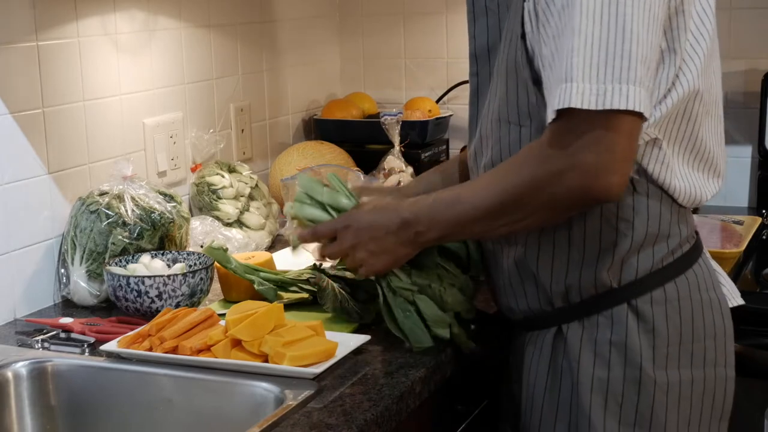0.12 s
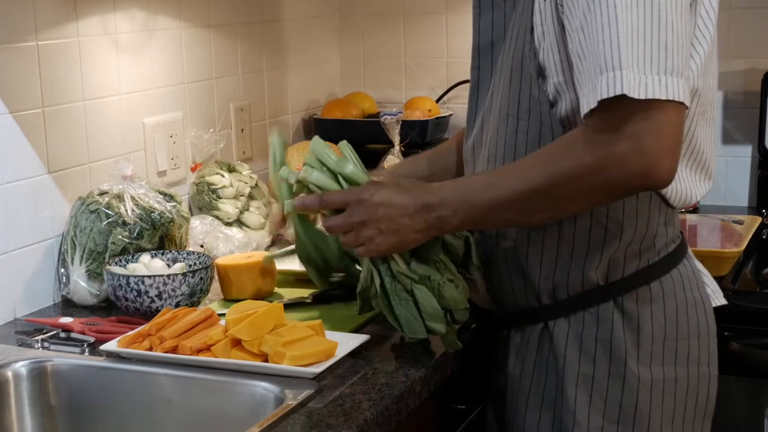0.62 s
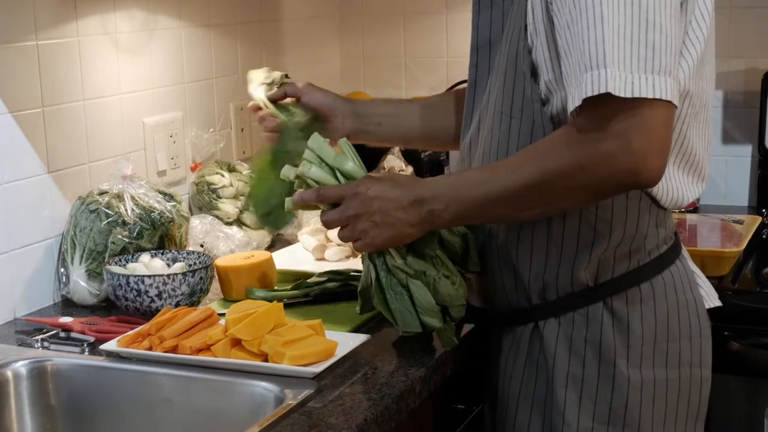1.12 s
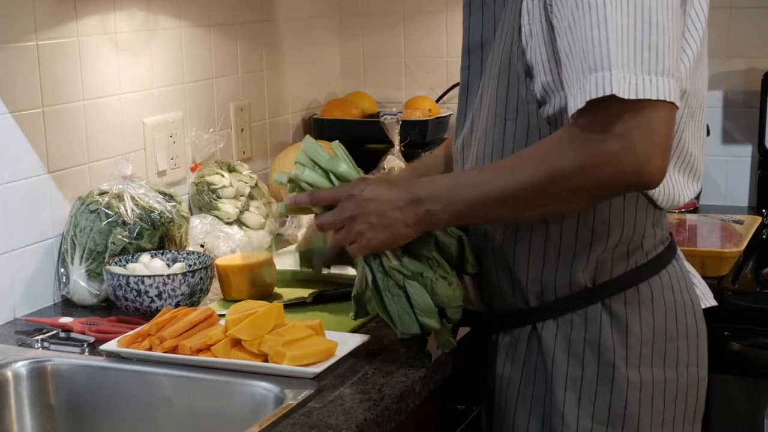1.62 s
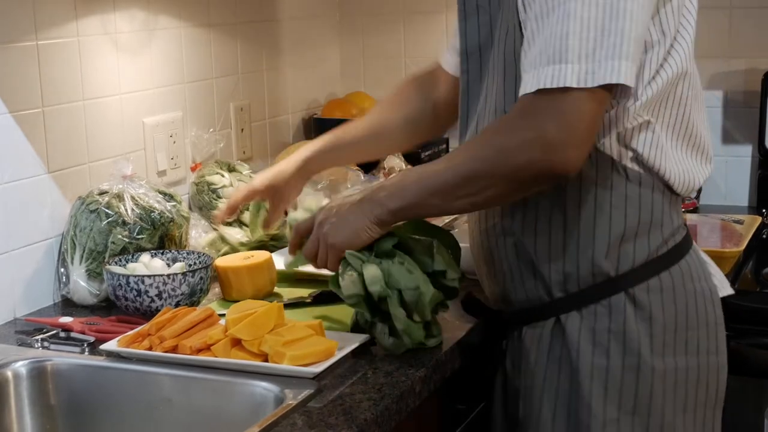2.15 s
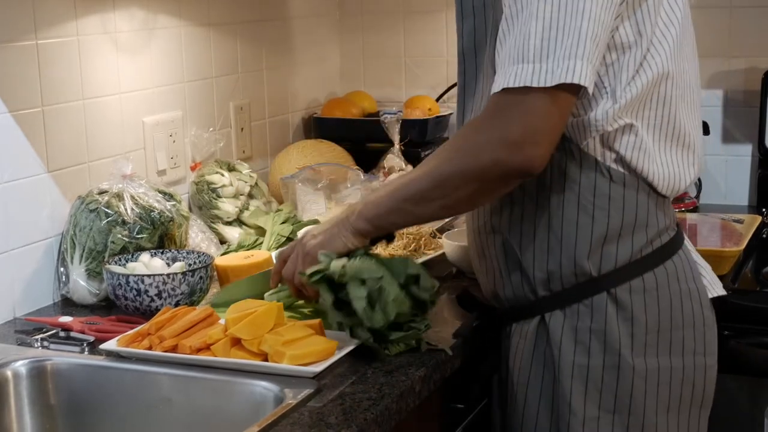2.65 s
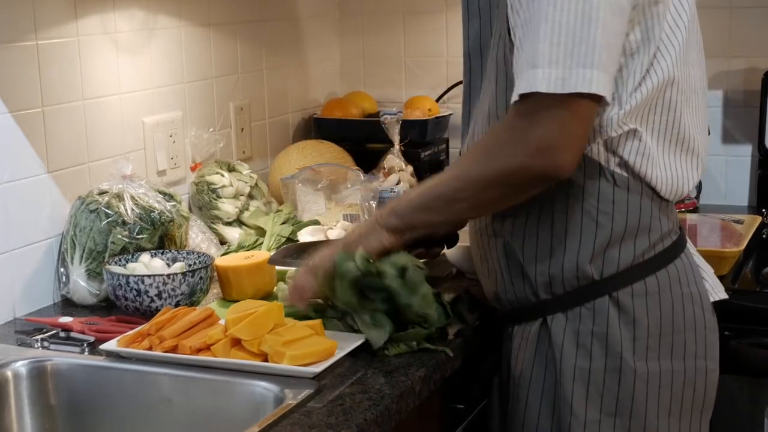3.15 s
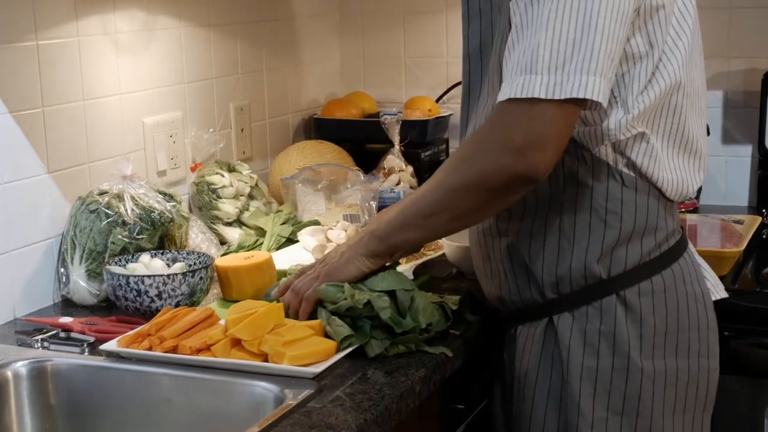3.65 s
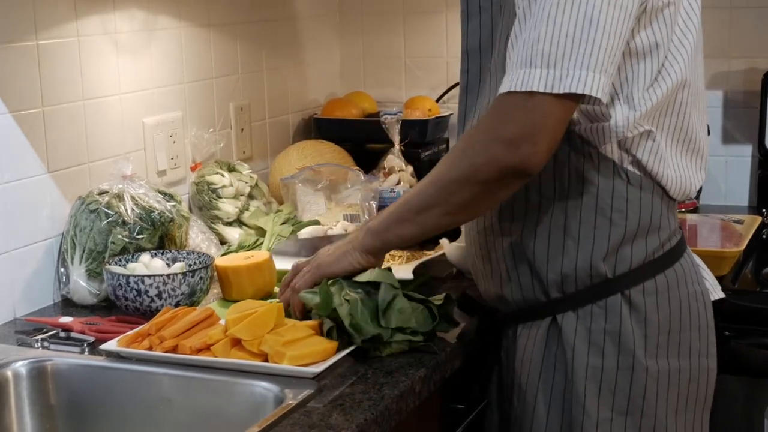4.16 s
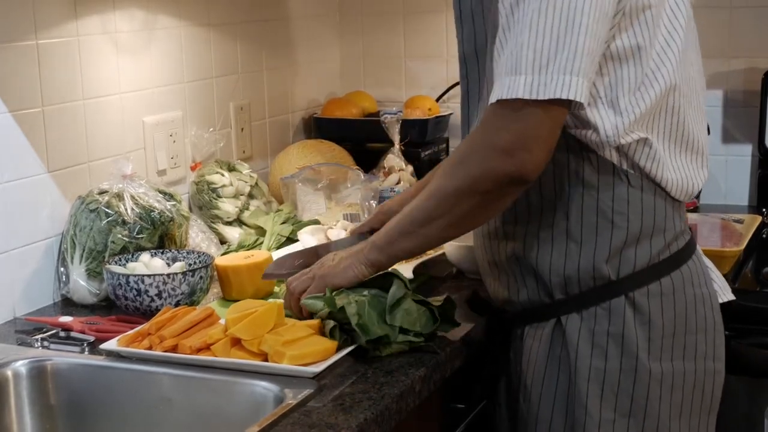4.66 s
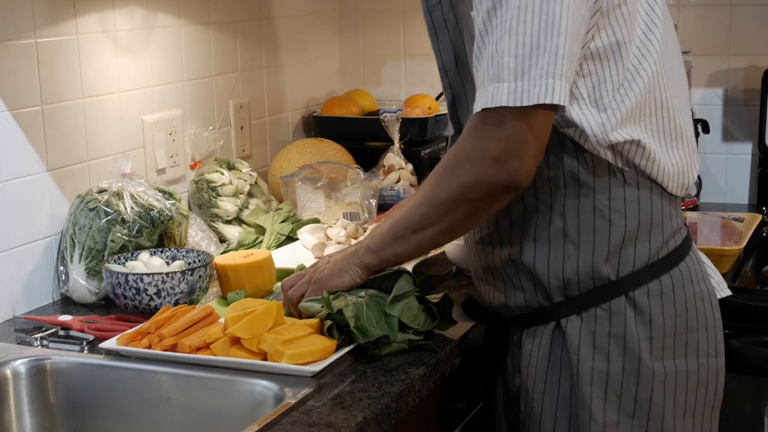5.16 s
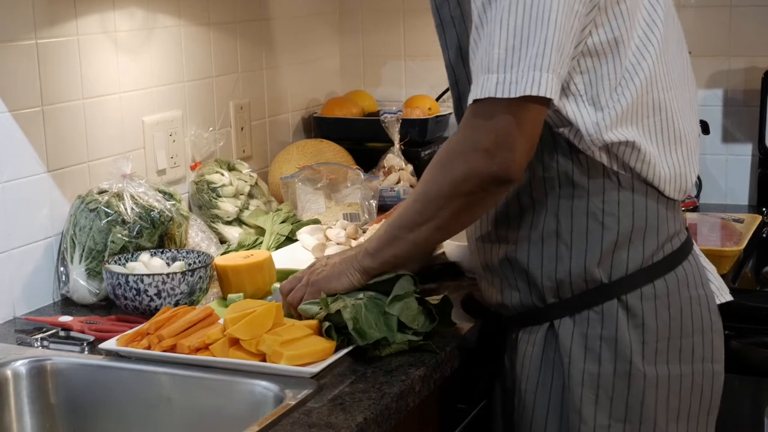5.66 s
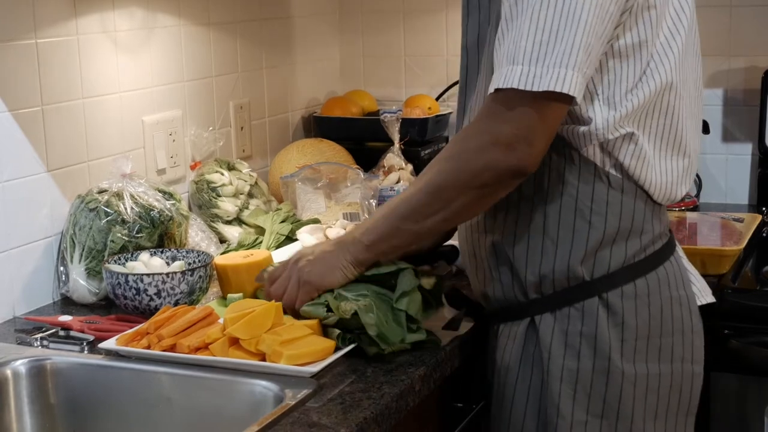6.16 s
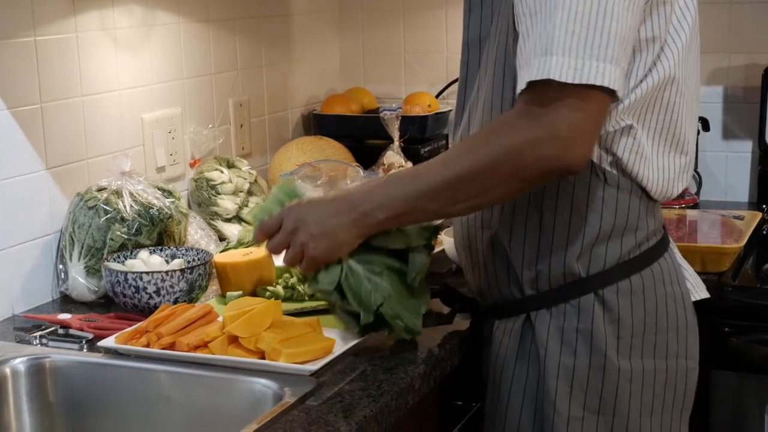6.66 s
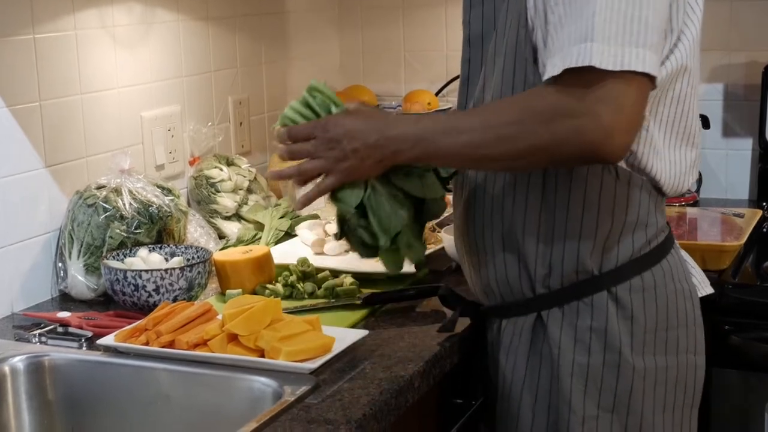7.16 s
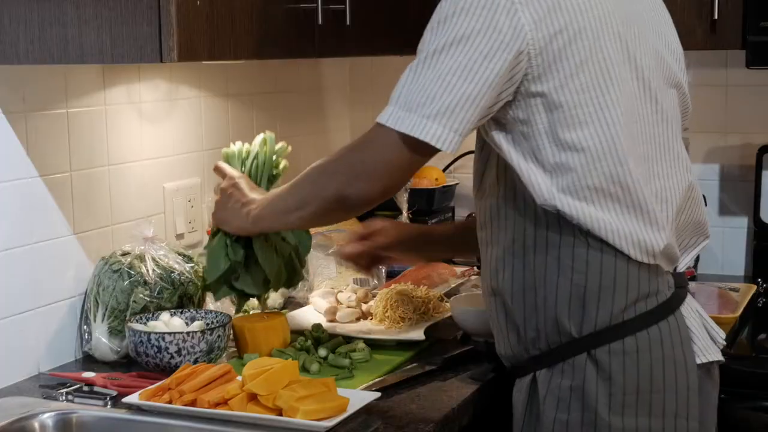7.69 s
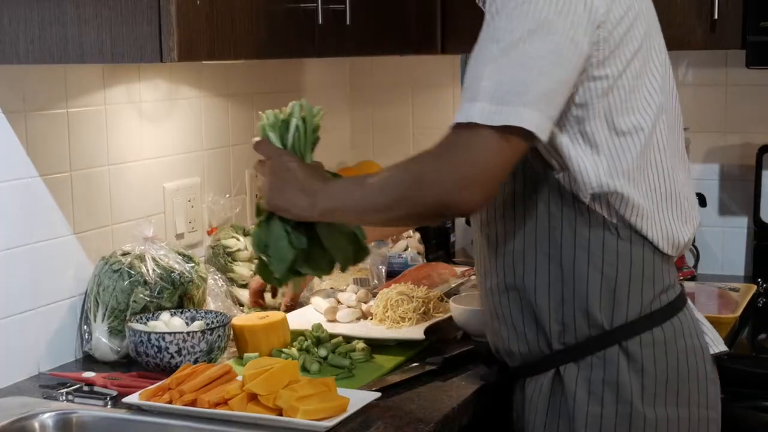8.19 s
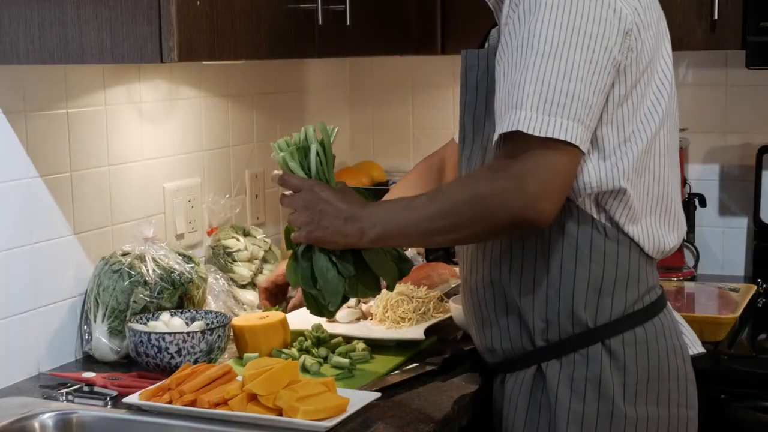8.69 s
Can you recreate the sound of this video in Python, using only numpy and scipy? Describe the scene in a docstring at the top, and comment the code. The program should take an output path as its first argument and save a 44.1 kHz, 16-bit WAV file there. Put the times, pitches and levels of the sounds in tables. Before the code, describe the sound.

Leafy greens rustle and snap in a cook's hands, then hard knife chops knock a cutting board in a softly humming tiled kitchen.

```python
"""Leafy greens rustle and snap as a cook sorts them: grainy, patchy noise and short resonant noise bursts.
Blows and dragged loads excite the bending modes of a cutting board; the knife blade sings as it slides.
Dishes ring as decaying sines, soft loads flex the counter, and an appliance drones over air noise and rumble.
Decaying noise tails give the tiled room's answer; one microphone hears it, almost alike on both channels."""
import sys
import numpy as np
from scipy import signal
from scipy.fft import rfft, irfft, next_fast_len
from scipy.io import wavfile
from scipy.ndimage import uniform_filter1d, map_coordinates

SR = 44100
rng = np.random.default_rng(int(sys.argv[2]) if len(sys.argv) > 2 else 0)


def master_out(mix):
    """Clip the mix to full scale and print it as 16-bit PCM to the path in sys.argv[1]."""
    frames = np.transpose(np.atleast_2d(mix))
    ceiling = np.clip(frames, -1, 1)
    pcm = np.round(ceiling * 32767).astype(np.int16)
    wavfile.write(sys.argv[1], SR, pcm)


def gain_from_db(level_db):
    """Convert decibel levels to linear amplitude factors (20 dB per decade)."""
    decades = np.asarray(level_db, float) / 20
    return 10 ** decades


N = 388521  # samples in the scene

# Room tone spectrum: f/Hz, relative density/dB per Hz
ROOM_TONE_SPECTRUM = [(41, -76), (70, -16), (118, -15), (142, -11), (228, -2.5), (321, -6), (403, -6),
                      (483, -12), (566, -15), (695, -16), (892, -16.5), (1280, -20), (1760, -30),
                      (3110, -37), (16000, -55)]
ROOM_TONE_DB = -55
# Appliance drone: f/Hz, width of each of two cascaded resonances/Hz, level/dB
APPLIANCE_DRONE = [(157.2, 19.8, -60)]
# Rumble swells: peak t/s, level/dB, rise over 20 dB/s, fall over 20 dB/s
RUMBLE_SWELLS = [(.6, -62, .9, .9), (3.24, -61, .9, 0.37), (4.86, -54, .3, .4), (5.7, -66, .5, .9)]
# Rumble spectrum: f/Hz, relative level/dB
RUMBLE_SPECTRUM = [(8, -46), (24, 11.5), (45, 8.5), (65, -16), (85, -34), (200, -86)]
RUMBLE_FLOOR_DB = -64.5
# Decay of the room's answer: f/Hz, t60/s
ROOM_DECAY = [(200, 0.66), (1000, 0.38), (4000, 0.43), (12000, 0.28)]

# Weight landing on the counter: t/s, level/dB
THUD_BLOWS = [(0.907, -47), (1.463, -43), (2.183, -51), (2.359, -44), (3.46, -57), (4.751, -48),
              (4.799, -38), (4.842, -38.5), (5.239, -50), (5.5, -46.5), (6.357, -50), (6.534, -48),
              (7.377, -54)]
# Counter modes: nominal f/Hz, level/dB, t60/s
COUNTER_MODES = [(58, -3, 0.41), (98, -4.5, 0.18), (160, 0, 0.11)]

# Plate modes: f/Hz, level/dB, t60/s
PLATE_MODES = [(1105, -4, 0.28), (1588, 1.5, 0.14), (1710, 4.5, .09), (2390, -1, 0.033), (2800, -6, 0.055),
               (3003, -8, 0.18), (3600, -10.5, 0.11), (3870, -12, .06), (4400, -28, .1), (5140, -17, 0.18),
               (5975, -21, .14), (6300, -21, .16), (7138, -37, 0.092), (9114, -19, 0.094),
               (10710, -26, .13), (11190, -25, .12)]
# Blows on the plate: t/s, level/dB
PLATE_HITS = [(3.471, -32), (3.592, -51)]
# Bowl modes: f/Hz, level/dB, t60/s
BOWL_MODES = [(1890, -7, .08), (2266, -2.5, 0.26), (2590, -14, .22), (3050, -18, .19), (3250, -5.5, 0.13),
              (3914, -2, .09), (5020, -11, 0.085), (5706, -2.5, 0.047), (7330, -11, 0.066), (7300, -6, .12),
              (8312, -8.5, 0.05), (8920, -4, .08), (9600, -13, .08), (10930, -13, .08),
              (11300, -19.5, 0.071)]
# Blows on the bowl: t/s, level/dB
BOWL_HITS = [(2.421, -42.5), (2.428, -41.5), (8.766, -54.5)]
# Steel utensil modes: f/Hz, level/dB, t60/s
UTENSIL_MODES = [(3790, 0, .2), (4660, -3, .25), (4990, -5, .22), (5400, -11, .2), (5986, -5, .25),
                 (7047, -11, .12), (8200, -8, .1)]
# Blows on the utensil: t/s, level/dB
UTENSIL_HITS = [(0.909, -54), (.925, -57), (0.959, -62), (1.005, -61), (1.037, -71)]
DULLER = 0.45  # dB per octave lost for each dB below the hardest blow

# Knife blade resonances: f/Hz, width/Hz, relative level/dB
BLADE_MODES = [(2560, 90, 7.5), (3000, 27, 5), (3240, 130, 1.5), (3780, 160, 0), (4660, 74, 2),
               (5460, 160, 6.5), (8640, 290, -3)]
# Blade sliding: peak t/s, level/dB, rise over 20 dB/s, fall over 20 dB/s
BLADE_SLIDES = [(5.9, -39.5, 0.1, 0.062), (6.53, -71, .02, .07)]

# Board bending modes: f/Hz, width/Hz, relative level/dB
BOARD_MODES = [(338, 10, 0), (480, 85, 2), (559, 30, -4.5), (630.6, 35, 1.5), (785, 37, -1.5),
               (920, 54, -1), (1114, 130, -4), (1186, 76, 0.5), (1298, 68, -0.5), (1389, 41, -1.5),
               (1548, 65, 4), (1734, 59, -0.5), (1905, 103, 3), (2320, 110, 9.5)]
# Things dragged over the board: peak t/s, level/dB, rise over 20 dB/s, fall over 20 dB/s, centre f/Hz
BOARD_DRAGS = [(.93, -49.5, 0.088, 0.18, 850), (2.17, -59.5, 0.18, 0.48, 770),
               (2.43, -37, 0.086, 0.065, 714), (2.61, -41.5, 0.074, 0.1, 900), (3.45, -68, 0.21, 0.59, 900),
               (3.898, -64.5, 0.27, 0.68, 1110), (4.69, -55, 0.067, 0.035, 1130),
               (4.92, -34, 0.05, 0.19, 800), (5.0, -49.5, 0.074, 0.29, 1060),
               (5.28, -43, 0.096, 0.049, 1050), (5.48, -53.5, 0.37, 0.35, 915),
               (5.72, -56, 0.061, .13, 937), (5.827, -35.5, 0.032, 0.2, 986),
               (5.899, -35, 0.12, 0.095, 816), (6.04, -62, .1, .3, 920), (6.54, -32.5, 0.076, 0.12, 970),
               (6.66, -52, .2, 0.26, 860)]
RESTING_DB, RESTING_HZ = -80, 990  # the board under idle hands
# Blows on the board: t/s, peak level of the wood/dB, crack level relative to it before colouring/dB,
# centre f/Hz, rattle t60/s
BOARD_BLOWS = [(.891, -39, -22, 870, 0.21), (.909, -27, -6, 850, 0.02), (.959, -34.5, -36, 830, 0.036),
               (1.004, -40, -21, 804, 0.054), (1.035, -39.5, -22, 890, .05), (1.463, -30, -5, 950, 0.035),
               (2.355, -32, -16, 536, 0.059), (2.417, -31, 10.5, 730, 0.047), (2.582, -42, -2, 910, 0.028),
               (2.626, -30.5, -19, 740, 0.13), (2.887, -41.5, -21, 590, 0.12),
               (3.125, -44, -16, 766, 0.023), (3.471, -27.5, -4, 1090, 0.044), (3.835, -41, 7, 1470, 0.014),
               (3.893, -41.5, 7, 1200, .025), (4.563, -42.5, 6.5, 1350, 0.035),
               (4.657, -40.5, -20, 557, 0.085), (4.866, -33, 12.5, 785, 0.24),
               (4.927, -10.5, -1, 1290, 0.014), (5.232, -18, -8, 1240, 0.014),
               (6.357, -9.5, 1.5, 1140, 0.079), (6.511, -17, -4, 920, .05), (6.548, -19.5, -26, 840, 0.056),
               (8.765, -40.5, -1, 753, .04)]
# Crack gain: f/Hz, gain/dB
CRACK_GAIN = [(1500, -38), (2200, -7.5), (3000, -6), (5500, -16), (8000, -22), (13000, -40), (16000, -55)]
NARROW_DB = 13  # mode fall-off at a crack level of 0 dB, dB per octave squared
NARROW_PER_CRACK = 0.76  # softer contact picks fewer modes: added fall-off per dB of weaker crack
BOARD_LOWEST_HZ = 425
# The worktop under the board answers each blow: f in Hz, level relative to the blow in dB, t60 in s
THUMP_HZ, THUMP_DB, THUMP_T60 = 312, -18, 0.042

# Leaf hiss spectrum: f/Hz, relative density/dB per Hz
LEAF_SPECTRUM = [(120, -35), (400, 5), (800, 3.5), (1500, 1.5), (2500, -0.5), (4000, -3.5), (8500, -7),
                 (10500, -14.5), (14000, -17), (16000, -35)]
# Leaves pulled, turned or squeezed: peak t/s, level/dB, rise over 20 dB/s, fall over 20 dB/s
LEAF_RUSTLES = [(.012, -53, .02, 0.13), (.41, -64.5, 0.04, 0.1), (.635, -61, 0.011, 0.37),
                (.9, -52.5, 0.093, 0.21), (1.17, -63, 0.042, .06), (1.28, -62, 0.2, .1),
                (1.456, -55, 0.0026, 0.096), (1.558, -54, 0.026, .055), (1.658, -61.5, 0.095, .06),
                (1.722, -64.5, 0.059, 0.34), (2.079, -56.5, 0.0033, 0.13), (2.176, -43.5, 0.083, 0.1),
                (2.32, -54.5, 0.03, 0.18), (2.41, -49.5, 0.017, 0.43), (2.604, -52, 0.13, 0.046),
                (2.838, -55, 0.12, .2), (3.076, -55.5, 0.078, 0.35), (3.186, -63, 0.039, 0.76),
                (3.466, -54.5, 0.011, 0.14), (3.84, -60, 0.17, 0.36), (3.885, -62.5, .01, 1),
                (4.22, -76, 0.028, 0.64), (4.56, -63, .01, 0.13), (4.69, -47, 0.041, 0.024),
                (4.75, -46, 0.036, 0.033), (4.88, -35, 0.14, 0.11), (5.25, -38, 0.088, 0.12),
                (5.53, -53.5, 0.014, 0.16), (5.71, -54.5, 0.077, 0.069), (5.89, -39.5, 0.11, 0.083),
                (6.52, -29.5, 0.0088, 0.078), (6.89, -59, 0.0059, 0.35), (7.05, -62.5, 0.15, 0.11),
                (7.21, -69, 0.024, 0.05), (7.26, -61.5, .02, 0.14), (7.53, -58.5, 0.081, .06),
                (7.58, -60.5, 0.027, 0.069), (8.11, -58.5, 0.082, .22), (8.26, -53, 0.053, 0.059),
                (8.41, -60, 0.22, 0.11), (8.51, -64, 0.067, 0.4), (8.75, -65, .12, 0.035)]
# How busy the hands are and how dry the leaves sound: t/s, median rustle level/dB, treble gain/dB
HAND_ACTIVITY = [(0, -74, -1), (.8, -67, 5), (1.4, -78, 1.5), (2.1, -76, 4.5), (2.7, -61, -1),
                 (3.7, -123, 0.5), (4.45, -81.5, 6), (5.05, -61, 5.5), (5.9, -61.5, -4.5),
                 (6.3, -65.5, -3.5), (6.85, -71.5, -6), (7.2, -64, 4), (7.75, -75.5, -0.5),
                 (8.05, -78.5, 9.5), (8.3, -83, 7.5), (8.81, -86, 12)]
# Stems and leaves snapping: t/s, starting level/dB, centre f/Hz
LEAF_SNAPS = [(.633, -52, 6000), (.818, -54.5, 3280), (.9095, -41.5, 4050), (1.463, -50, 3100),
              (1.56, -49, 7900), (2.078, -68, 3400), (2.3211, -57, 4070), (2.4083, -54, 3190),
              (3.476, -41.5, 3000), (3.886, -46.5, 5100), (4.657, -52, 3000), (4.684, -43, 3050),
              (4.7266, -39.5, 3420), (4.742, -39, 3700), (4.781, -42.5, 4000), (4.811, -34.5, 5450),
              (4.8503, -31.5, 4780), (4.9297, -44, 2740), (5.1696, -62, 2870), (5.1941, -48, 2530),
              (5.23, -35, 3000), (5.8183, -47, 2590), (6.234, -61, 2450), (6.3595, -53, 2650),
              (6.891, -52, 3000), (7.01, -55, 2870), (7.0465, -56, 2580), (7.2586, -56, 5060),
              (7.5707, -52.5, 2280), (8.1693, -55.5, 5060)]
GESTURE_SHAPE = 1.165  # exponent of rise and fall: 1 pointed, 2 bell

# Faint steady hiss, opposite in sign in the two channels: f/Hz, relative density/dB per Hz
HISS_SPECTRUM = [(18, -29.5), (30, 5), (303, -8.5), (437, -5), (1390, -7), (14000, -10), (16000, -8)]
# Faint random-phase spread between the channels: f/Hz, gain before random variation/dB
SPREAD_GAIN = [(200, -38), (2000, -28.5), (12000, -16)]
TOP_HZ = 16100  # band limit


def unit(x):
    """Normalization: x at rms 1."""
    return x / np.sqrt(np.mean(x ** 2) + 1e-20)


def along(points, hz):
    """Interpolation of (f, value) points on a logarithmic frequency axis."""
    f, v = np.transpose(points)
    return np.interp(np.log(hz + 1), np.log(f + 1), v)


def smooth(t, v):
    """Linear interpolation of v to every sample."""
    return np.interp(np.arange(N) / SR, t, v)


def curves(rows):
    """Linear interpolation in time of each column after the first."""
    t, *columns = np.transpose(rows)
    return [smooth(t, column) for column in columns]


def wobble(rate):
    """Smooth random modulation: a spline through random knots, rate a second and at most 600."""
    knots = rng.standard_normal(int(N * 600 / SR) + 4)
    return map_coordinates(knots, [np.arange(N) * min(rate, 600) / SR])


def filtered(x, response):
    """Linear filtering: the spectrum of x times a complex response."""
    m = next_fast_len(len(x) + SR // 2)
    hz = np.fft.rfftfreq(m, 1 / SR)
    return irfft(rfft(x, m) * response(hz), m)[:len(x)]


def coloured(x, spectrum):
    """Spectral shaping by (f, level) points, at rms 1."""
    return unit(filtered(x, lambda hz: gain_from_db(along(spectrum, hz))))


def resonant(x, peaks):
    """Modal superposition: causal band-pass resonances summed with alternating sign."""
    def response(f):
        total = 0
        for k, (centre, width, db) in enumerate(peaks):
            bandpass = 1j * f * width / (centre * centre - f * f + 1j * f * width)
            total = total + (-1) ** k * gain_from_db(db) * bandpass
        return total
    return filtered(x, response)


def grainy(spike_db, rate):
    """Stick-slip friction: noise whose strength jumps from moment to moment, as many tiny slips."""
    return rng.standard_normal(N) * gain_from_db(spike_db * wobble(rate))


def patchy(x, patchy_db):
    """Random modulation in patches of frequency and time, at rms 1."""
    z = signal.stft(x, nperseg=256)[2]
    field = uniform_filter1d(rng.standard_normal(z.shape), size=6, axis=0)
    field = uniform_filter1d(field, size=9, axis=1)
    return unit(signal.istft(z * gain_from_db(patchy_db * unit(field)), nperseg=256)[1][:N])


def bursts(times, db, t60):
    """Impulsive excitation: noise starts at once and decays exponentially in t60."""
    out, t = np.zeros(N + SR), np.arange(SR // 5) / SR
    for s, level, life in zip(times, db, t60):
        decay = gain_from_db(level - 60 * t / max(life, 1 / SR))
        out[round(s * SR):][:len(t)] += decay * rng.standard_normal(len(t))
    return out[:N]


def gestures(rows):
    """Power envelope of each gesture: it swells to its peak and dies away."""
    t = np.arange(0, N, 32) / SR
    power = []
    for s, db, rise, fall, *_ in rows:
        distance = np.where(t < s, (s - t) / abs(rise), (t - s) / abs(fall))
        power.append(gain_from_db(db - 20 * distance ** GESTURE_SHAPE) ** 2)
    return t, np.array(power)


def swells(rows):
    """Energy addition: the joint gain of all gestures."""
    t, power = gestures(rows)
    return smooth(t, np.sqrt(power.sum(axis=0)))


def kitchen():
    """Stationary noise: air and machines, a narrow-band wavering drone, and low rumble that swells."""
    tone = gain_from_db(ROOM_TONE_DB) * patchy(coloured(rng.standard_normal(N), ROOM_TONE_SPECTRUM), patchy_db=1.23)
    hz, width, db = APPLIANCE_DRONE[0]
    narrow_noise = resonant(rng.standard_normal(N), [(hz, width, 0)])
    drone = gain_from_db(db) * unit(resonant(narrow_noise, [(hz, width, 0)]))
    rumble = coloured(rng.standard_normal(N), RUMBLE_SPECTRUM)
    rumble_gain = np.hypot(swells(RUMBLE_SWELLS), gain_from_db(RUMBLE_FLOOR_DB))
    return tone + drone + rumble_gain * rumble


def walls(x):
    """Diffuse reverberation: each frequency decays at its own speed, with a new tail each third of a second."""
    out, step = np.zeros(N + 2 * SR), SR // 3
    for start in range(0, N, step):
        hz, t, z = signal.stft(rng.standard_normal(SR // 2), SR, nperseg=256)
        decay = gain_from_db(-60 * t / along(ROOM_DECAY, hz)[:, None])
        tail = signal.istft(z * decay, SR, nperseg=256)[1]
        wet = signal.fftconvolve(x[start:start + step], tail / np.linalg.norm(tail))
        out[start + 130:][:len(wet)] += wet  # the answer begins 130 samples late
    return out[:N]


def thuds():
    """Flexural vibration: the counter bends slowly under a soft load."""
    out, t = np.zeros(N + SR), np.arange(SR // 2) / SR
    onset = 1 - np.exp(-t / 0.01)
    for s, db in THUD_BLOWS:
        ring = 0
        for nominal_hz, level, t60 in COUNTER_MODES:
            hz = nominal_hz * rng.uniform(0.9, 1.22)
            ring = ring + gain_from_db(level - 60 * t / t60) * np.sin(2 * np.pi * hz * t)
        out[round(s * SR):][:len(t)] += gain_from_db(db) * onset * ring
    return out[:N]


def ringing(modes, blows, waver_db):
    """Free modal decay: each blow rings all modes, and contact with neighbours makes each mode waver."""
    out, t = np.zeros(N + SR), np.arange(SR // 2) / SR
    knots = np.arange(30) / 60
    hardest_db = max(db for _, db in blows)
    for s, db in blows:
        tilt_db = DULLER * (hardest_db - db)  # gentler blows sound duller
        ring = 0
        for hz, level, t60 in modes:
            waver = waver_db * np.interp(t, knots, rng.standard_normal(len(knots)))
            mode_db = level - tilt_db * np.log2(hz / modes[0][0]) + waver - 60 * t / t60
            ring = ring + gain_from_db(mode_db) * np.sin(2 * np.pi * hz * t)
        out[round(s * SR):][:len(t)] += gain_from_db(db) * ring
    return out[:N]


def dishes():
    """Struck-body resonance: a plate, a bowl and a steel utensil chink."""
    plate = ringing(PLATE_MODES, PLATE_HITS, waver_db=2.5)
    bowl = ringing(BOWL_MODES, BOWL_HITS, waver_db=4)
    utensil = ringing(UTENSIL_MODES, UTENSIL_HITS, waver_db=4)
    return plate + bowl + utensil


def knife():
    """Friction-driven resonance: the blade sings while it slides over the board."""
    return swells(BLADE_SLIDES) * unit(resonant(grainy(spike_db=0, rate=140), BLADE_MODES))


def favoured(mode_hz, centre_hz, fall_db):
    """Modal participation: the place of contact decides which modes sound; others fall off from the centre."""
    return gain_from_db(-fall_db * np.log2(mode_hz / centre_hz) ** 2)


def drags():
    """Stick-slip excitation: a dragged load keeps the board's modes sounding, those near its centre most."""
    t, power = gestures(BOARD_DRAGS)
    resting_power = gain_from_db(RESTING_DB) ** 2
    total = power.sum(axis=0) + resting_power
    drag_hz = np.transpose(BOARD_DRAGS)[-1]
    centre = smooth(t, (drag_hz @ power + RESTING_HZ * resting_power) / total)
    slips = grainy(spike_db=3.0, rate=450)
    rub = np.zeros(N)
    for k, mode in enumerate(BOARD_MODES):
        rub += (-1) ** k * favoured(mode[0], centre, fall_db=22) * resonant(slips, [mode])
    return smooth(t, np.sqrt(total)) * unit(rub)


def knocks():
    """Impact excitation of dispersive bending waves: blows ring the board; hard contact adds a crack."""
    s, db, crack_db, centre, rattle = np.transpose(BOARD_BLOWS)
    narrow = np.maximum(NARROW_DB - NARROW_PER_CRACK * crack_db, 0)
    wood, t = np.zeros(N + SR), np.arange(SR // 8) / SR
    # a small board radiates no bass
    small = signal.butter(4, BOARD_LOWEST_HZ, "highpass", fs=SR, output="sos")
    thump = gain_from_db(THUMP_DB - 60 * t / THUMP_T60) * np.sin(2 * np.pi * THUMP_HZ * t)
    thump = thump * (1 - np.exp(-t / 0.0021))
    for at, level, mid_hz, fall, life in zip(s, db, centre, narrow, rattle):
        ring = 0
        for k, (hz, width, mode_db) in enumerate(BOARD_MODES):
            # bending waves disperse, so the modes reach the air out of step
            wave = np.sin(2 * np.pi * hz * t - 0.156 * k * k)
            ring = ring + gain_from_db(mode_db) * favoured(hz, mid_hz, fall) * np.exp(-np.pi * width * t) * wave
        push = gain_from_db(-60 * t / life) * rng.standard_normal(len(t))  # the loose board chatters
        push[0] = 5  # the blow itself
        blow = signal.fftconvolve(push, ring * (1 - np.exp(-t / 0.00014)))
        blow = signal.sosfilt(small, blow)
        start = round(at * SR)
        wood[start:][:len(blow)] += gain_from_db(level) * blow / np.abs(blow).max()
        wood[start:][:len(t)] += gain_from_db(level) * thump
    crack = bursts(s, db + crack_db, 0.023 + rattle)
    return wood[:N] + filtered(crack, lambda hz: gain_from_db(along(CRACK_GAIN, hz)))


def snaps():
    """Brittle fracture: stiff ribs and stems release noise through a broad resonance, quickly damped."""
    out, t = np.zeros(N + SR), np.arange(SR // 10) / SR
    for s, db, hz in LEAF_SNAPS:
        a = np.exp(-2 * np.pi * hz * 0.28 / SR)  # pole radius: the width grows with the centre
        poles = [1, -2 * a * np.cos(2 * np.pi * hz / SR), a * a]
        noise = signal.lfilter([1, 0, -1], poles, rng.standard_normal(len(t)))
        out[round(s * SR):][:len(t)] += gain_from_db(db - 60 * t / 0.046) * unit(noise)
    return out[:N]


def leaves():
    """Dry friction and fracture: rubbing leaves hiss in grains; stiff ribs and stems snap."""
    busy_db, top_db = curves(HAND_ACTIVITY)
    hiss = patchy(coloured(grainy(spike_db=2.0, rate=170), LEAF_SPECTRUM), patchy_db=2.5)
    treble = filtered(hiss, lambda hz: 1 / (1 + (8000 / (hz + 1)) ** 4))
    rustle_gain = np.hypot(swells(LEAF_RUSTLES), gain_from_db(busy_db + 5.4 * wobble(15)))
    rustle = rustle_gain * (hiss + (gain_from_db(top_db) - 1) * treble)
    return rustle + snaps()


def scene():
    """Superposition: direct sounds and the room's answer add at the one microphone."""
    blows = knocks()
    chinks = dishes()
    rubs = drags() + leaves() + knife()
    room = walls(gain_from_db(-6.0) * blows + gain_from_db(-6.0) * chinks + gain_from_db(-11) * rubs)
    mid = blows + chinks + rubs + room + thuds() + kitchen()
    return np.array([mid, mid])


def roll_off(x):
    """The treble ends steeply here."""
    return signal.sosfilt(signal.butter(12, 16330, fs=SR, output="sos"), x)


def record(dry):
    """Decorrelation: faint random-phase spread and hiss, opposite in sign in the two channels; then a band limit."""
    hz, _, z = signal.stft(dry[0], SR, nperseg=1024)
    variation = uniform_filter1d(rng.standard_normal(z.shape), size=6, axis=0)
    variation = uniform_filter1d(variation, size=2, axis=1)
    random_phase = np.exp(2j * np.pi * rng.random(z.shape))
    spread_db = along(SPREAD_GAIN, hz)[:, None] + 6.84 * unit(variation)
    side = signal.istft(z * random_phase * gain_from_db(spread_db), SR, nperseg=1024)[1][:N]
    side = side + gain_from_db(-80) * coloured(rng.standard_normal(N), HISS_SPECTRUM)
    channels = dry + [[1], [-1]] * side  # opposite sign in the two channels
    mix = np.array([filtered(channel, lambda hz: hz < TOP_HZ) for channel in channels])
    return roll_off(mix)


dry = scene()
out = record(dry)
master_out(out)
```